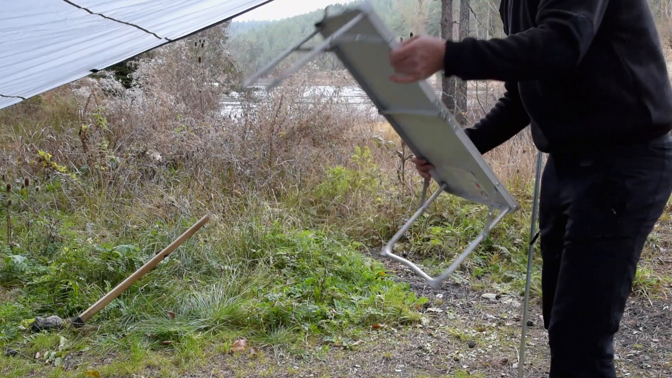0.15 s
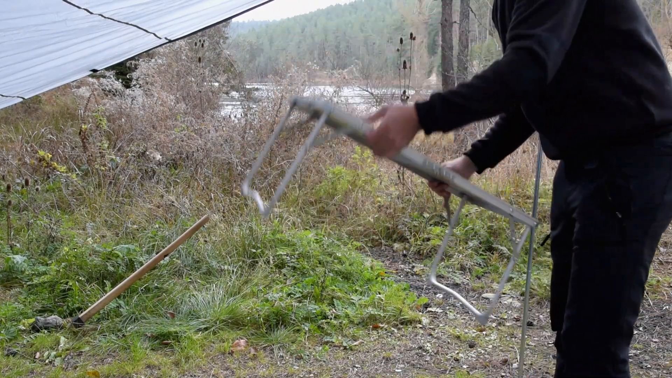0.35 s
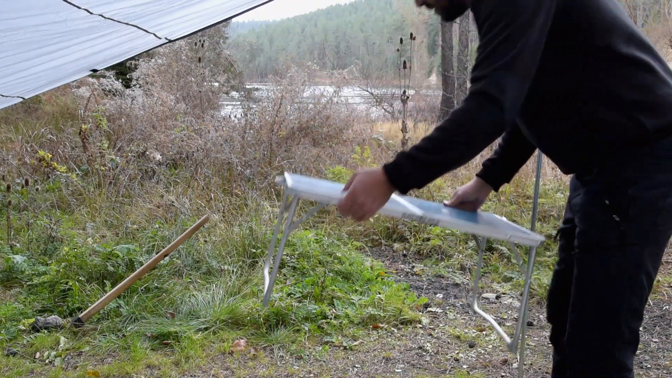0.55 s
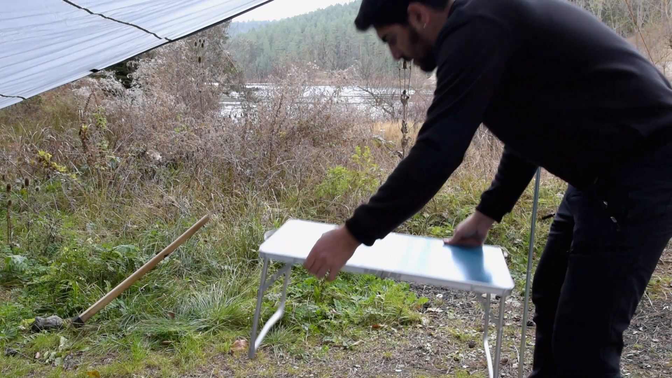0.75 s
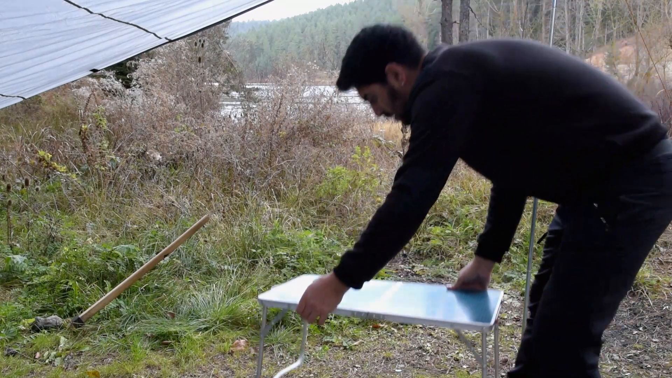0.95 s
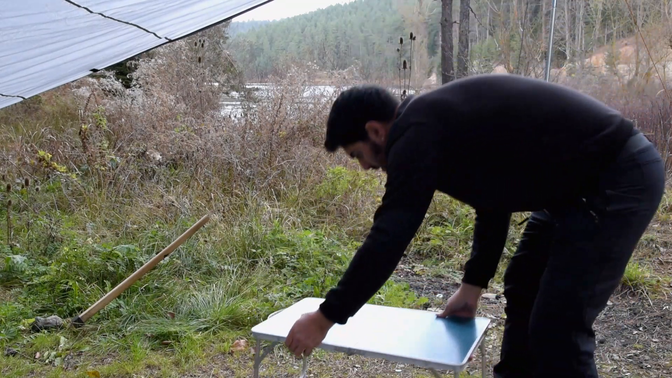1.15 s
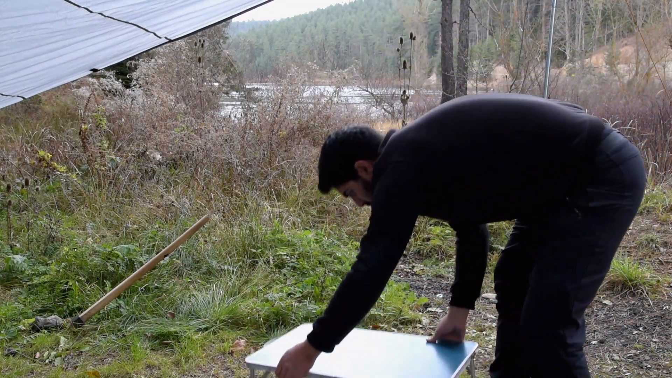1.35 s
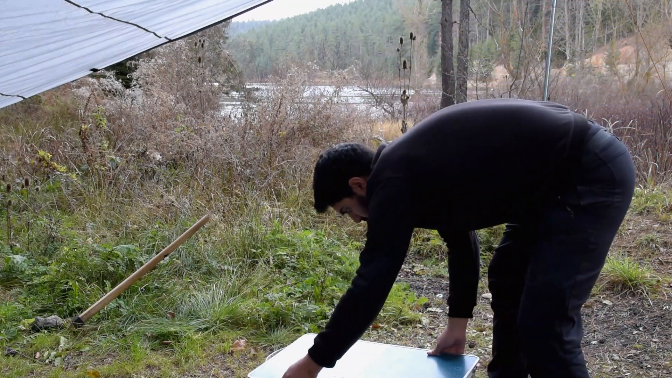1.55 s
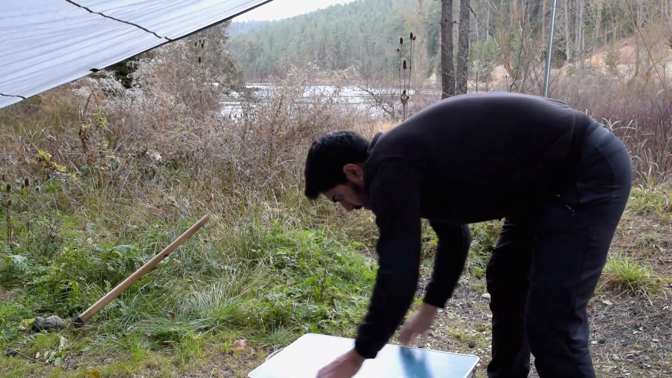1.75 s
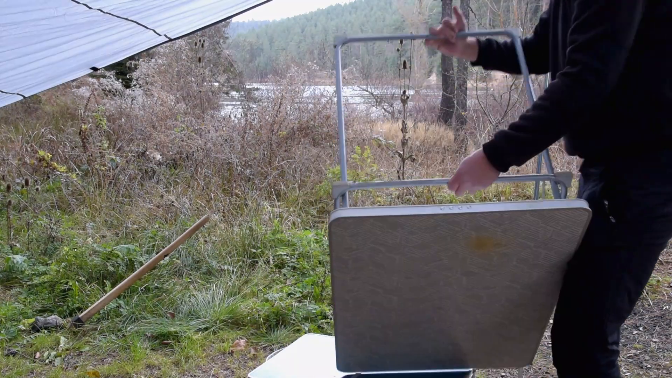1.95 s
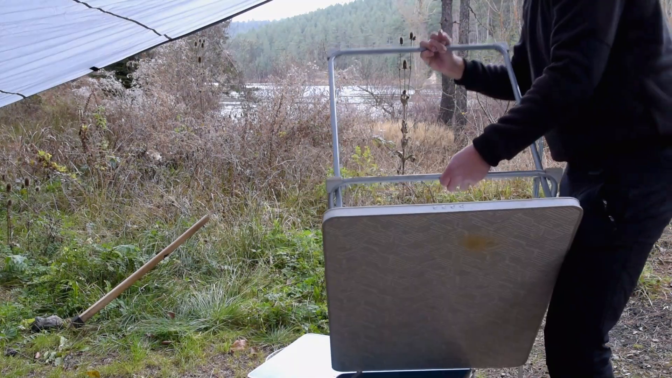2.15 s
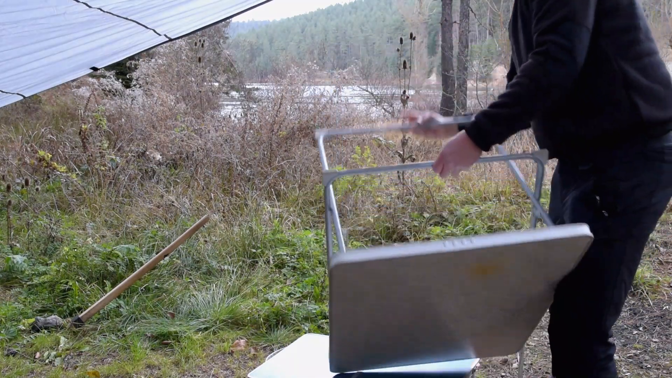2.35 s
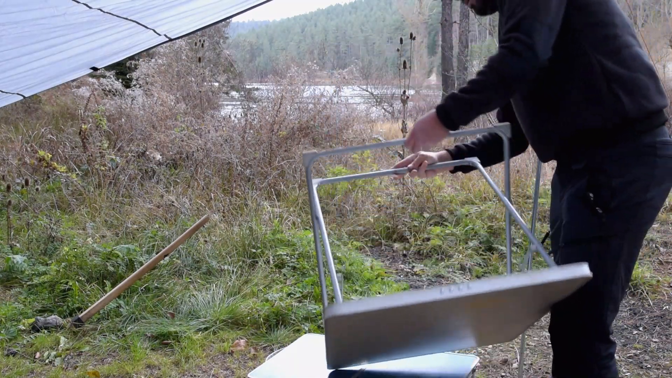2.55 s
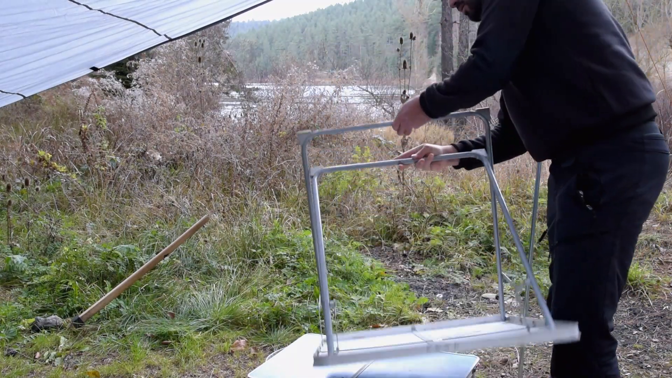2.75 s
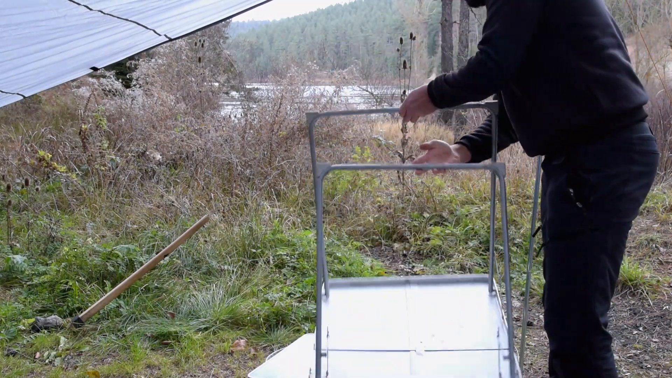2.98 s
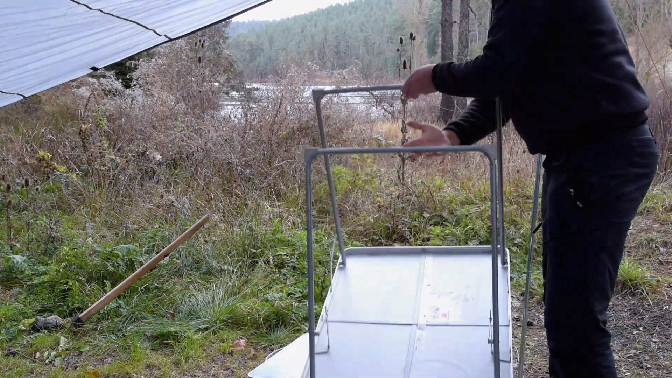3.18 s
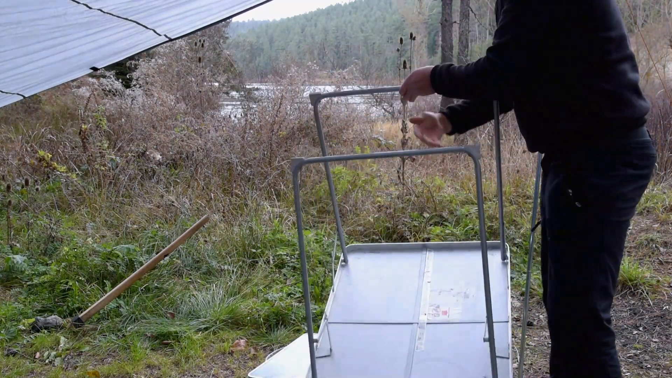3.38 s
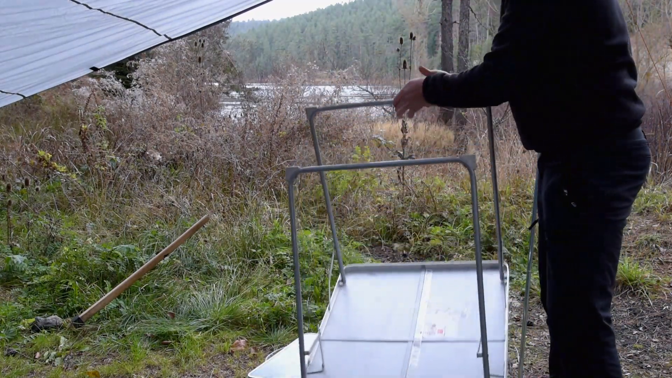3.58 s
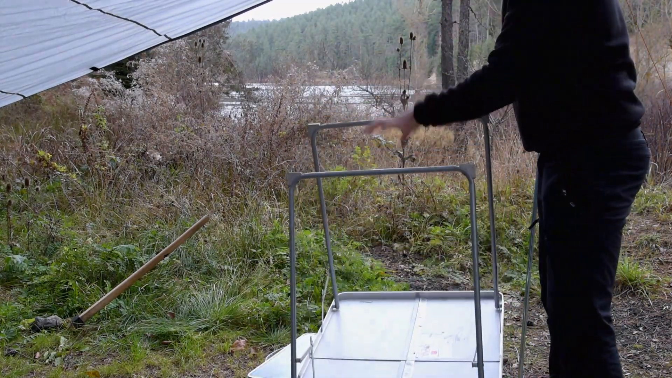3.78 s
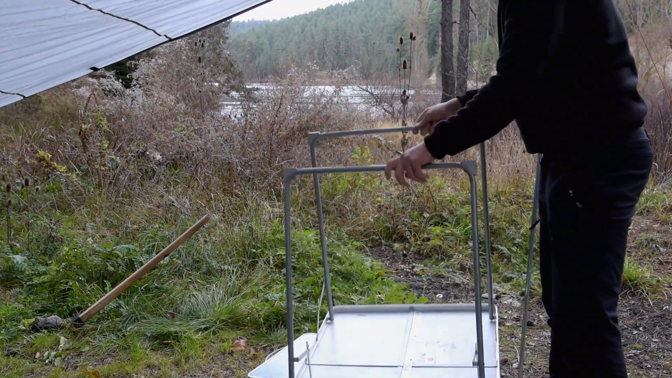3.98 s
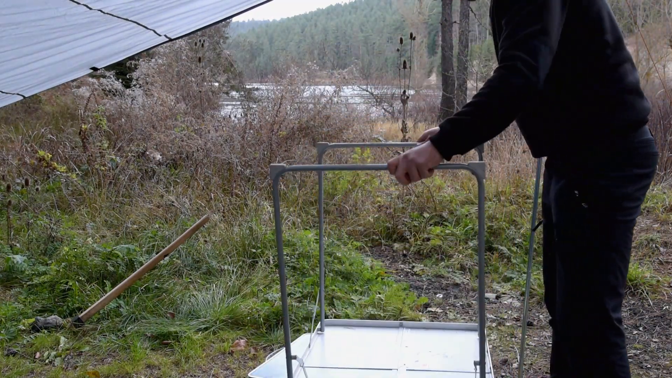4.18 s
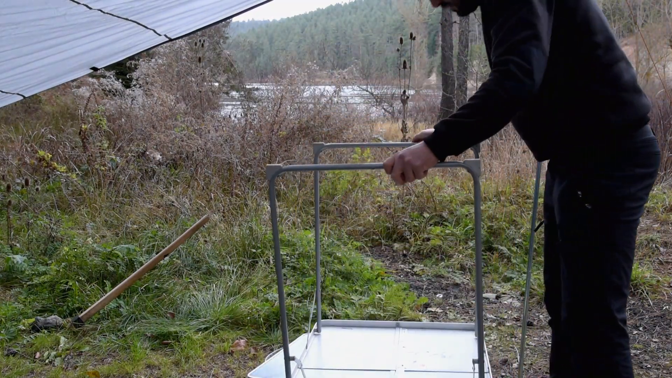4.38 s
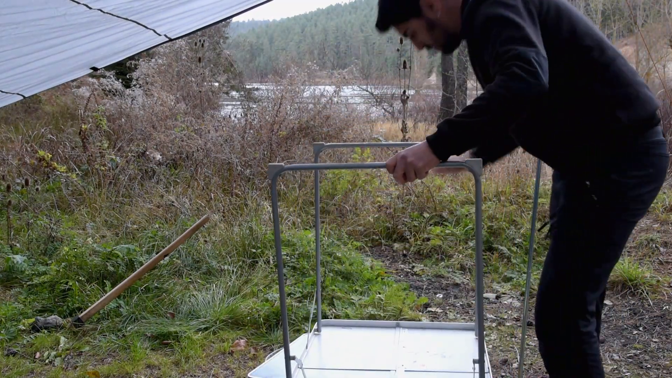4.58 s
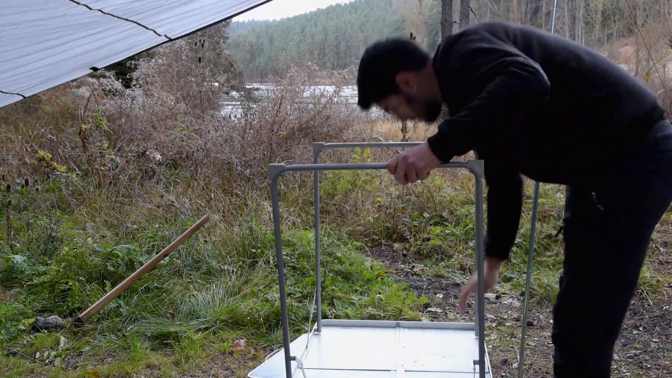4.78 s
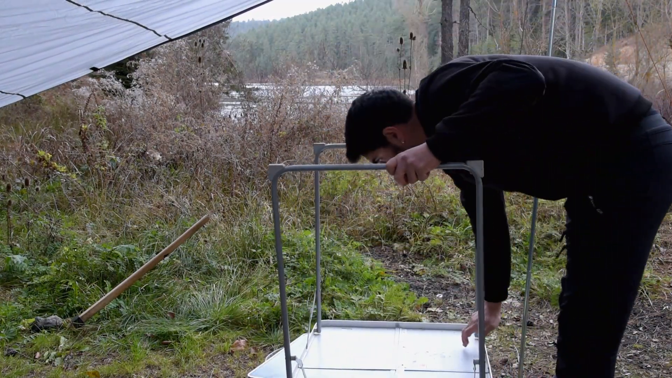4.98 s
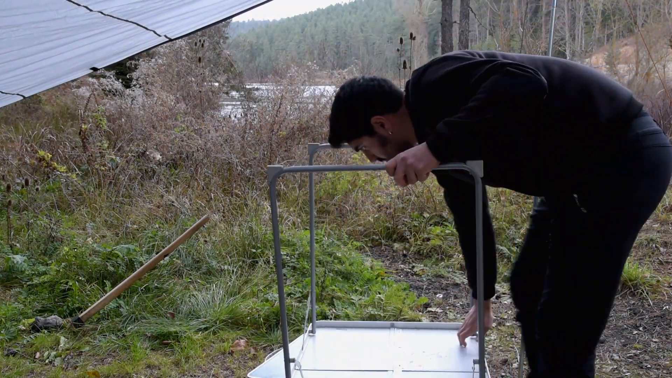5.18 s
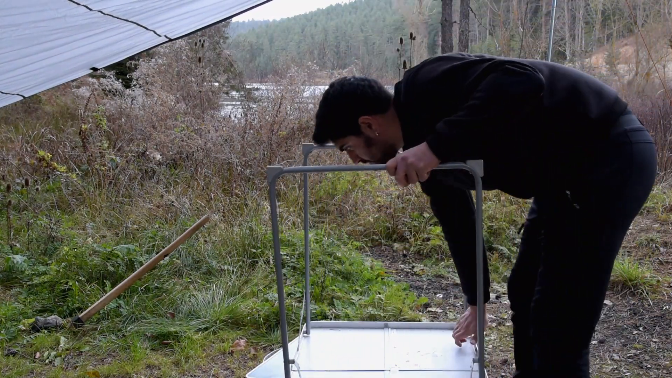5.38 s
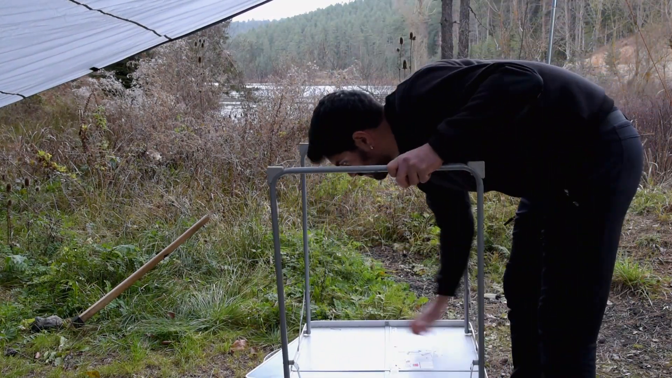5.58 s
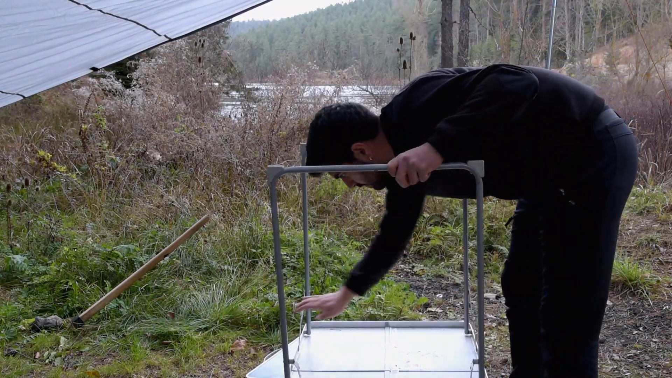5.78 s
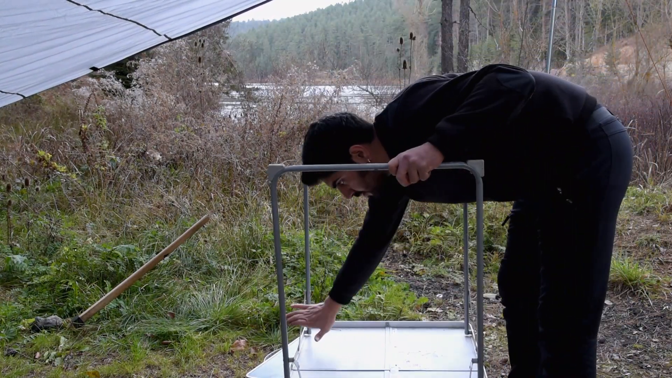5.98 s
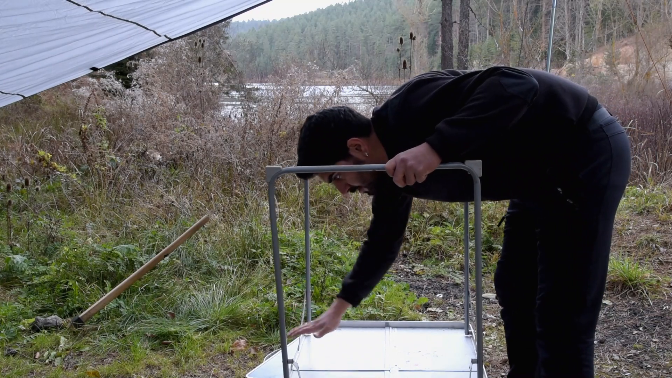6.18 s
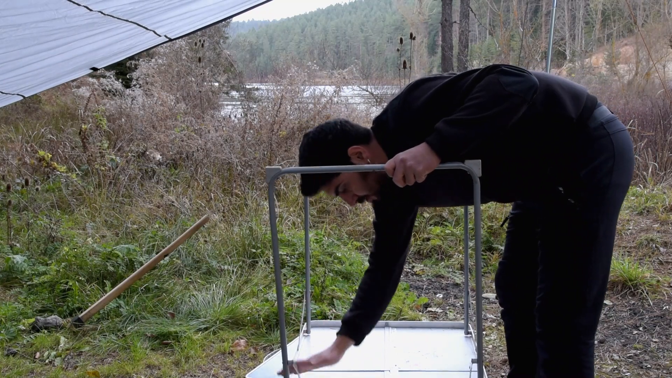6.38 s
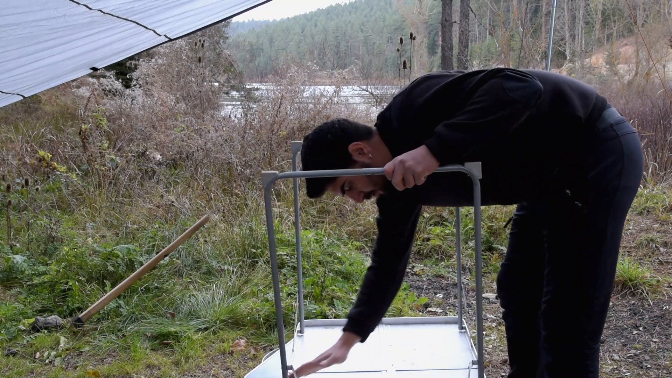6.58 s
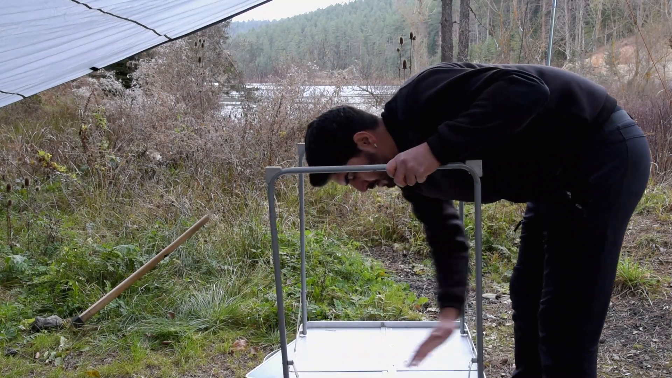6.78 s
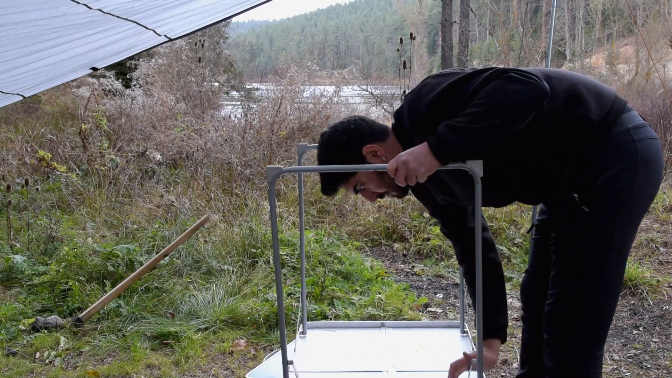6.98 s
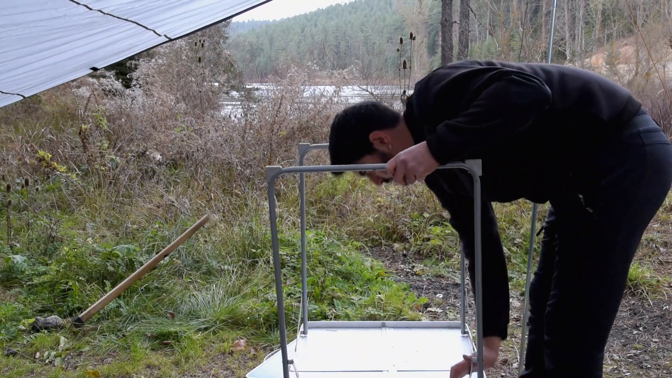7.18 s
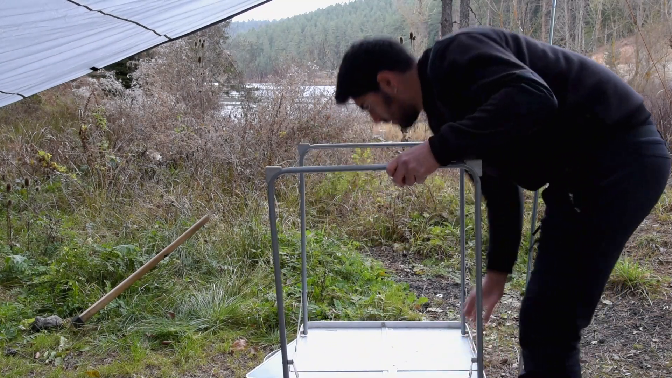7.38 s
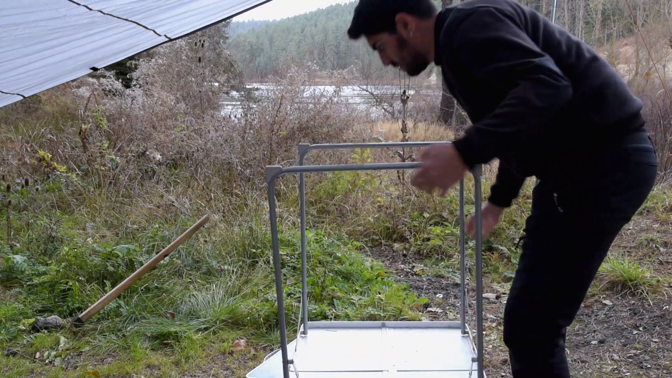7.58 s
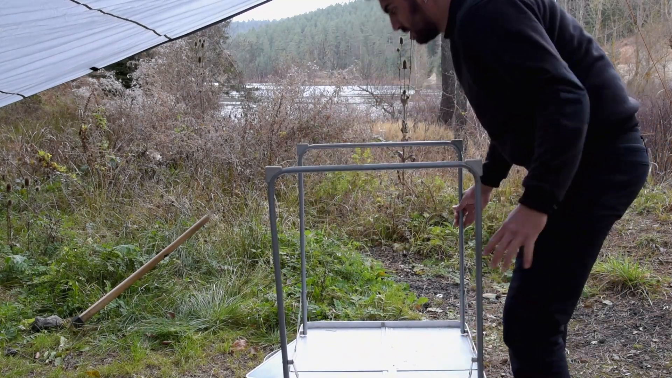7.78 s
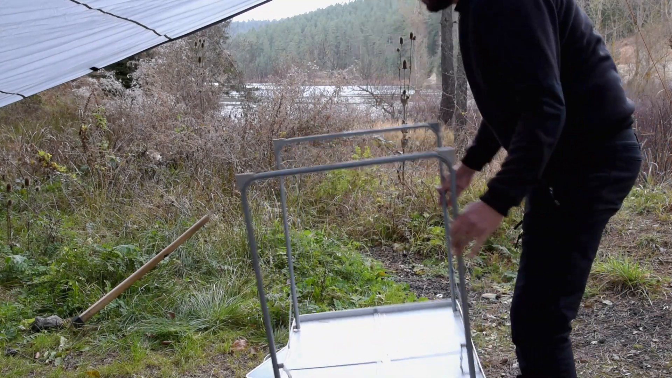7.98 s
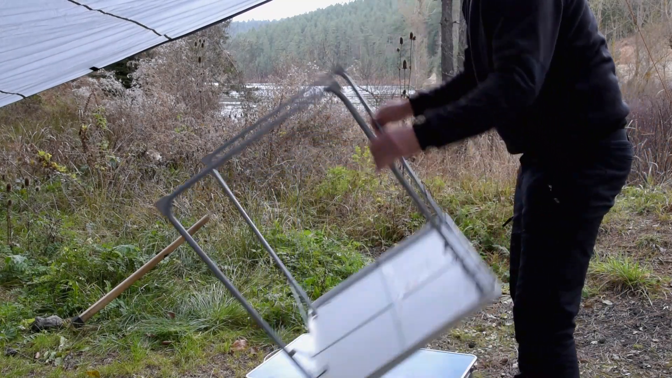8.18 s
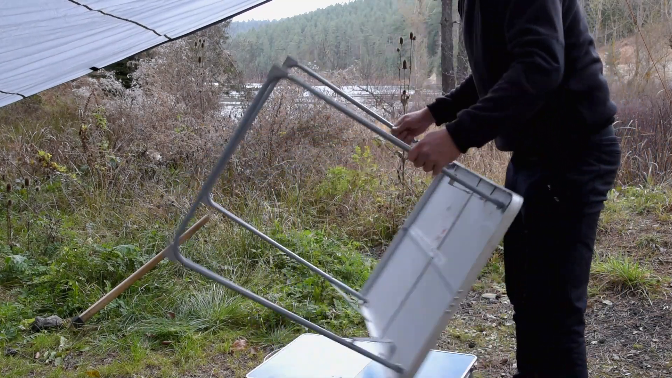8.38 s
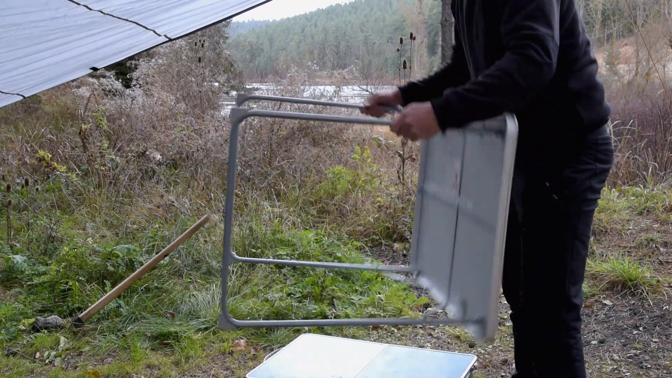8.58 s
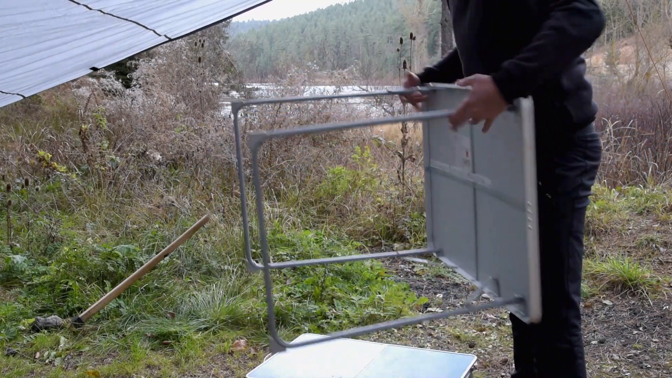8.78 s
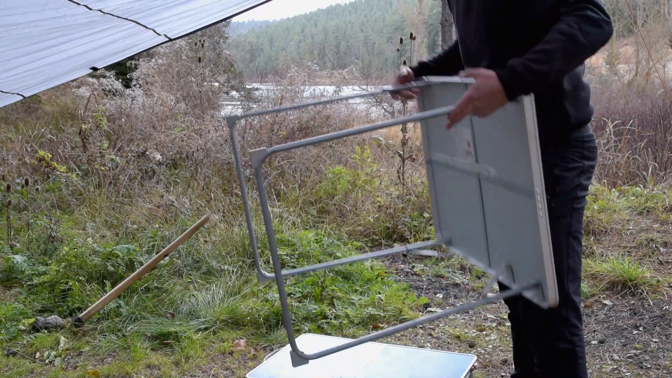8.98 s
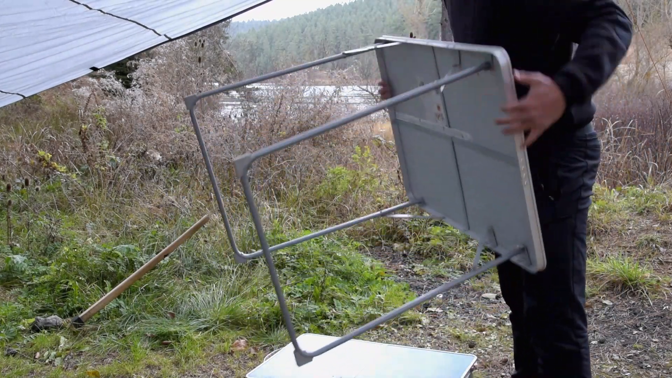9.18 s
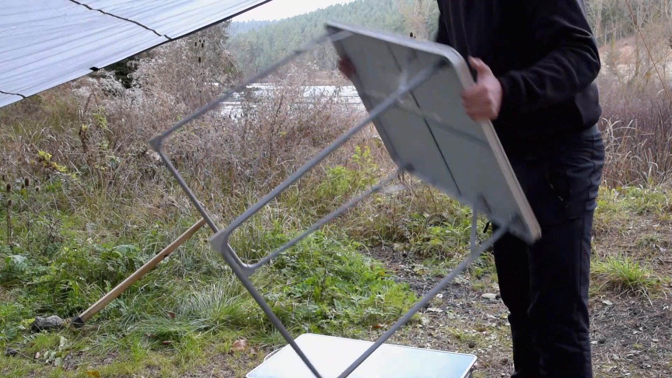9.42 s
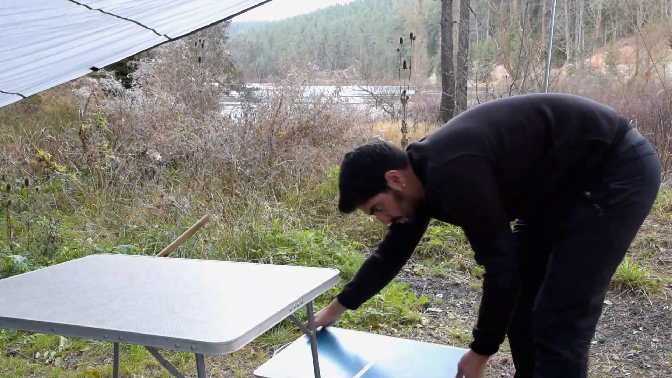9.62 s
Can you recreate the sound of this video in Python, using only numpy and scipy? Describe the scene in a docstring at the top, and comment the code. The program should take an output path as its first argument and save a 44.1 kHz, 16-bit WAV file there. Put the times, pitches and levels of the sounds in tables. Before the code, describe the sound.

Someone unfolds a metal-framed camp table outdoors. After a click and soft rustling of cloth and grass, legs and braces snap into place with sharp knocks, hollow clatter and dull bumps of the table top. The legs slide with a ringing scrape, and lighter ticks follow. Near the end the table is lifted and its loose catches rattle. It sounds close and slightly to the right, over a faint hiss of air.

```python
"""Outdoors, in light air and a low rumble, someone unfolds a metal-framed camp table. Legs, braces and
catches knock, and each knock shakes three parts: the small bright fittings, the hollow tubes and the
table top. Cloth and grass brush these parts, and hands, joints and feet scrape them. Sliding legs ring
the frame, catches tick, a turning joint whistles thinly, and a short low hum rises once.
Near the end the table is lifted and its loose catches rattle."""
import sys
import numpy as np
from scipy import signal
from scipy.fft import rfft, irfft, next_fast_len
from scipy.io import wavfile
from scipy.ndimage import map_coordinates

SR = 44100
rng = np.random.default_rng(int(sys.argv[2]) if len(sys.argv) > 2 else 0)


def transcribe(u):
    """Save the signal u as a 16-bit wav file named by the first command-line argument.

    u: samples, shape (n,) or (channels, n), limited to [-1, 1]; the rate is SR.
    q: integer samples, one column per channel.
    """
    v = np.clip(np.atleast_2d(u).T, -1, 1)
    q = np.round(v * 32767).astype(np.int16)
    wavfile.write(sys.argv[1], SR, q)


N = 425561


def amp(db):
    return 10 ** (np.asarray(db) / 20)


def unit(x):
    return x / np.sqrt(np.mean(np.abs(x) ** 2) + 1e-20)


def along(points, hz):
    """Read between (frequency, value) points on a log frequency scale."""
    f, v = np.transpose(points)
    return np.interp(np.log(hz + 1), np.log(f + 1), v)


def wobble(rate):
    """A smooth random curve with `rate` new values a second."""
    values = rng.standard_normal(int(N * rate / SR) + 4)
    return map_coordinates(values, [np.arange(N) * rate / SR])


def filtered(x, response):
    """Multiply each frequency in x by response(hz)."""
    size = next_fast_len(N + SR // 2)
    return irfft(rfft(x, size) * response(np.fft.rfftfreq(size, 1 / SR)), size)[..., :N]


def ring(modes, force):
    """A force shakes a part, which rings at its own pitches (its modes)."""
    def response(f):
        return unit(sum((-1) ** k * amp(db) * 1j * f * width / (hz * hz - f * f + 1j * f * width)
                        for k, (hz, width, db) in enumerate(modes)))
    return filtered(force, response)


def gesture(start, swell, hold, fade):
    """Strength of one move: it swells by 15.5 dB, holds, then drops 60 dB in `fade` seconds."""
    t = np.arange(N) / SR - start
    rising_db = 15.5 * (t / swell - 1)
    falling_db = -60 * (t - swell - hold) / fade
    return amp(np.clip(np.minimum(rising_db, falling_db), -120, 0)) * (t > 0)


def gestures(rows):
    """Overlapping moves add their power; a row is a move's timing, then its level."""
    return np.sqrt(sum((amp(db) * gesture(*timing)) ** 2 for *timing, db in rows))


def tone(hz, gain, waver_hz, flutter_db, rate):
    """A tone whose pitch and loudness tremble."""
    phase = 2 * np.pi * np.cumsum(hz + waver_hz * wobble(rate)) / SR
    return np.sqrt(2) * gain * amp(flutter_db * wobble(rate)) * np.sin(phase)


def noise(colour):
    """Two separate noises with the same balance of low and high."""
    return unit(filtered(rng.standard_normal((2, N)), lambda hz: amp(along(colour, hz))))


# Tone colour of the air: f/Hz, relative level/dB
AIR_COLOUR = [(59, -35), (100, -23), (150, 0.5), (358, -0.5), (1100, -10), (3190, -14.5), (3620, -12.5),
              (8640, -15), (9610, -13), (14100, -21), (16000, -28)]


def air():
    """Light air makes a soft, nearly steady hiss."""
    return amp(-62.5 + 0.4 * wobble(13)) * noise(AIR_COLOUR)


# Tone colour of the rumble: f/Hz, relative level/dB
RUMBLE_COLOUR = [(12, -65), (20, -14), (97, 0), (130, -2), (170, -6), (290, -120)]
# Heavy thumps: t/s, level/dB
THUMPS = [(1.46, -41.5), (1.49, -50), (1.99, -42.5), (2.03, -38), (2.23, -47.5), (2.29, -56), (2.53, -62),
          (2.75, -42), (2.8, -59), (3.05, -41.5), (3.09, -42), (3.18, -49), (3.329, -39.5), (3.94, -66),
          (4.12, -55), (4.22, -56), (5.23, -58), (5.93, -55), (6.44, -50), (7.07, -60), (7.96, -61),
          (8.41, -52.5), (8.87, -52), (9.16, -48), (9.24, -55)]


def rumble():
    """A faint, uneven rumble swells with each thump of the table."""
    swell_s, hold_s, fade_s = 0.016, 0.015, 0.3
    thumps = gestures((start, swell_s, hold_s, fade_s, db) for start, db in THUMPS)
    return np.hypot(thumps, amp(-68)) * amp(2.15 * wobble(19)) * noise(RUMBLE_COLOUR)


# Brushing on the fittings: t/s, level/dB
RUSTLE = [(0, -60.5), (.43, -59), (.78, -55), (1.5, -57.5), (2, -55), (4.4, -62.5), (4.8, -61), (5.4, -65),
          (6.3, -79), (7.7, -64), (8.2, -74), (9.65, -48)]


def rustle():
    """Cloth and grass brush the table: how hard they rub the fittings, tubes and top."""
    times, levels = np.transpose(RUSTLE)
    db = np.interp(np.arange(N) / SR, times, levels)
    return amp([db, db - 5, db - 13])


# Knocks: t/s, fittings level/dB, tubes above fittings/dB, top above fittings/dB, base fade time/s
KNOCKS = [(0.047, -24, -20, -29, 0.11), (0.702, -36, -17, -37, 0.21), (0.768, -36, -31, -20, 0.1),
          (1.212, -50, -1, -4, 0.045), (1.464, -29, -10, -10, 0.18), (1.505, -19, -1, -6.5, 0.053),
          (1.993, -10, -3.5, -5, 0.075), (2.051, -25.5, 1, 2, 0.045), (2.086, -28, -3, -3, 0.047),
          (2.125, -26, -6, -18, 0.052), (2.226, -31, 10.5, 5, 0.078), (2.253, -17.5, 0, -11.5, 0.12),
          (2.427, -38.5, -2, 0, 0.11), (2.754, -10, -4, -18, 0.088), (3.054, -7.5, -4.5, -4.5, 0.095),
          (3.095, -15.5, -4, -9.5, 0.14), (3.23, -26.5, 4.5, -2, 0.04), (3.269, -23, -2.5, -6, 0.1),
          (3.335, -8.5, -4.5, -10, 0.12), (3.397, -32, 9, 5.5, 0.096), (3.561, -26.5, -13, -20, 0.34),
          (3.707, -23, -10, -36, 0.11), (3.964, -37.5, 6, 6.5, 0.063), (4.027, -29, -13, -8, 0.091),
          (4.085, -23.5, -12, -25, 0.48), (4.12, -10, -4.5, -12, 0.11), (4.236, -17.5, 0, -11, 0.052),
          (4.38, -32.5, -33, -41, 0.13), (4.422, -26.5, -16.5, -46, 0.082), (4.463, -21.5, -17, -18, 0.036),
          (4.475, -29, -24, -35, 0.073), (4.684, -45, -14, -29, 0.22), (4.819, -32.5, -38, -40, 0.03),
          (4.94, -26, -10, -12.5, 0.2), (5.016, -22.5, -2, -5.5, 0.074), (5.082, -38, 4.5, 6, 0.06),
          (5.221, -25, -1, -6, 0.15), (5.295, -33, 13, 1, 0.049), (5.376, -44, 4, 4, 0.023),
          (5.503, -50, -17, -7, 0.13), (5.536, -42, -2.5, -9, 0.11), (5.583, -29.5, -17, -41, 0.043),
          (5.632, -51.5, 11, 11, 0.046), (5.707, -30.5, 3.5, -3.5, 0.056), (5.771, -36, 5.5, -0.5, 0.077),
          (5.895, -33.5, -28, -12, 0.08), (5.906, -25.5, -29, -27, 0.066), (5.939, -22.5, -5, -4, 0.14),
          (5.971, -14, -11, -21, 0.051), (6.051, -41, 1, 5.5, 0.054), (6.12, -35, -15, -34, 0.064),
          (6.137, -35, -21, -31, 0.097), (6.195, -30.5, -12.5, -27, 0.063), (6.318, -56.5, 7, 9.5, 0.044),
          (6.4, -41, -4, -3, 0.22), (6.422, -30.5, -12.5, -19, 0.55), (6.452, -15.5, -3, -8, 0.11),
          (6.649, -35.5, 4, 5.5, 0.086), (6.712, -42, -17, -21, 0.2), (6.733, -28.5, -11, -14.5, 0.16),
          (6.756, -21.5, -12, -16.5, 0.048), (6.825, -54, 3, 9, 0.088), (6.988, -17, -19, -24.5, 0.19),
          (7.023, -11.5, -10, -31, 0.059), (7.066, -44.5, 6, 10.5, 0.1), (7.123, -31, -12, -28, 0.079),
          (7.165, -39, -14, -34, 0.19), (7.244, -33, -1.5, -1, 0.044), (7.318, -32.5, -39, -33, 0.044),
          (7.416, -16, -19, -50, 0.063), (7.486, -50.5, 2.5, 8, 0.076), (7.68, -58, 4, 10, 0.12),
          (7.737, -21.5, -11.5, -30, 0.062), (7.833, -46, 5, 4, 0.054), (7.875, -28.5, -18, -39, 0.14),
          (7.891, -19, -18.5, -34, 0.059), (8.212, -32, -19, -44, 0.14), (8.247, -27.5, -35, -47, 0.085),
          (8.268, -30, -38, -47, 0.13), (8.295, -20, -34, -55, 0.079), (8.332, -29.5, -16.5, -47, 0.25),
          (8.375, -29, -31, -30, 0.11), (8.419, -28, -1, -16.5, 0.052), (8.452, -16, -42, -46, 0.059),
          (8.477, -16.5, -37, -42, 0.038), (8.582, -18, -23, -40, 0.12), (8.626, -25, -30, -23, 0.041),
          (8.677, -36, -30, -41, 0.16), (8.801, -17, -20, -34, 0.065), (8.845, -30, -19, -21, 0.088),
          (8.867, -21.5, -8.5, -18.5, 0.11), (8.91, -14.5, -23, -25, 0.073),
          (8.968, -14, -16.5, -35, 0.051), (9.025, -29.5, -26, -19, 0.058), (9.065, -36, -11, -11, 0.073),
          (9.091, -36, -24, -24, 0.059), (9.112, -27, -10.5, -9, 0.061), (9.168, -24, 0.5, -10.5, 0.1),
          (9.217, -23, -32, -28, 0.041), (9.246, -24, -0.5, -17, 0.071),
          (9.258, -10.5, -14.5, -14.5, 0.061), (9.313, -23, -39, -38, 0.15),
          (9.341, -17.5, -29, -41, 0.066), (9.377, -22.5, -17.5, -22, 0.059), (9.415, -25, -48, -42, 0.064),
          (9.445, -21.5, -48, -52, 0.058), (9.554, -22, -7.5, -26, 0.058)]


def knocks():
    """Each knock is a crack and a dying rattle: how hard it shakes the fittings, tubes and top."""
    starts, db, tubes_above, top_above, fades = np.transpose(KNOCKS)
    t = np.arange(SR // 3) / SR

    def shake(levels, stretch, crack_db, rise_s):
        power = np.zeros(N + SR)
        crack = amp(crack_db - 60 * t / 0.007)
        attack = 1 - np.exp(-t / rise_s)
        for start, level, fade in zip(starts, levels, fades):
            rattle = amp(-60 * t / (stretch * fade))
            power[round(start * SR):][:len(t)] += (amp(level) * (crack + rattle) * attack) ** 2
        return np.sqrt(power[:N])

    # Bigger parts rattle longer.
    return [shake(db - 11, stretch=0.97, crack_db=-6, rise_s=0.00058),
            shake(db + tubes_above - 9, stretch=1.324, crack_db=6, rise_s=0.00052),
            shake(db + top_above - 6, stretch=1.59, crack_db=9, rise_s=0.002)]


# Scrapes: t/s, swell/s, hold/s, fade/s, fittings level/dB, tubes above fittings/dB, top above fittings/dB
SCRAPES = [(0.052, 0.024, 0.16, 0.45, -46, -8.5, -16.5), (1.461, 0.044, 0.028, 0.055, -38.5, 0, -2.5),
           (1.615, 0.025, 0.032, 0.13, -72, -12.5, -19), (2.003, 0.034, 0.097, 0.35, -41.5, 0, 1),
           (2.3, 0.066, .03, 0.75, -44.5, -3.5, -6), (2.397, 0.13, 0.041, 0.38, -40, -2.5, -6),
           (2.615, 0.056, 0.078, 0.16, -52, 8, 5), (2.765, 0.024, 0.036, 0.21, -45.5, 2, 5.5),
           (3.097, 0.03, 0.043, 0.36, -45.5, 6.5, 9.5), (3.378, 0.049, 0.1, 1, -46.5, 8, 0.5),
           (3.542, 0.036, 0.069, 1, -29.5, -1.5, -39), (3.68, 0.019, 0.092, 0.41, -28.5, -10.5, -16),
           (3.862, 0.022, 0.077, 0.49, -35.5, -26, -17), (4.128, 0.017, 0.021, 0.45, -34, -2.5, -2),
           (4.254, 0.017, 0.037, 0.16, -41.5, -5.5, -20), (4.671, 0.022, 0.032, 0.08, -49.5, -7.5, -18),
           (5.113, 0.15, 0.036, 0.34, -38.5, 0.5, -5.5), (5.217, .02, 0.071, 0.31, -51.5, 9, 10.5),
           (5.895, 0.06, 0.056, 0.22, -44.5, -5.5, -17), (6.457, 0.028, 0.025, 0.088, -48, 16, 3),
           (6.502, 0.036, 0.075, 0.14, -43.5, -0.5, -7), (7.05, 0.024, 0.028, 0.19, -49.5, -7, -1),
           (7.915, 0.044, 0.058, 0.13, -38, -6, -18), (8.056, 0.047, 0.014, 0.17, -35.5, -6.5, -23),
           (8.389, 0.033, 0.085, 0.57, -39, -14.5, -17), (8.655, 0.043, 0.14, 0.24, -44.5, -17, -22.5),
           (8.823, .04, 0.11, .3, -39.5, -13, -15), (9.04, .03, .06, .2, -58, -3, -6),
           (9.143, 0.023, 0.13, 0.16, -36.5, -10, -15), (9.31, .02, .12, .15, -45, -29, -27),
           (9.548, 0.026, .1, .3, -45.5, -5.5, -10.5)]


def scrapes():
    """Hands, joints and feet scrape: how hard they rub the fittings, tubes and top."""
    *timing, db, tubes_above, top_above = np.transpose(SCRAPES)
    return [gestures(zip(*timing, db + above)) for above in (0, tubes_above, top_above)]


def grit(rough_db, rate):
    """Rubbing catches and slips, in fast grains and slower clumps."""
    return unit(amp(rough_db * wobble(rate) + 2.75 * wobble(35)))


# How tight fittings, loose catches, tubes and top ring: f/Hz, width/Hz, relative level/dB
FITTING_MODES = [(4630, 1800, -10.5), (5540, 450, -3.5), (6260, 770, -6), (7160, 440, -0.5),
                 (7670, 670, -1.5), (8770, 640, -2), (9470, 750, -2), (10840, 2330, -8.5),
                 (13070, 1400, -14)]
LOOSE_MODES = [(3050, 1240, -17.5), (4500, 1700, -13), (6900, 2170, -6), (8070, 810, -1.5),
               (9220, 640, -2.5), (10420, 1600, -8), (12700, 1800, -17)]
TUBE_MODES = [(871, 155, -9), (1015, 132, -6.5), (1277, 241, -6), (1540, 180, -6), (1970, 516, -9),
              (2510, 200, -7.5), (2654, 164, -8.5), (3164, 390, -9), (3754, 860, -14.5)]
TOP_MODES = [(106, 34, -14), (191, 69, -3), (298.3, 72, 1), (356, 58.5, 1), (436, 41.5, 1.5), (542, 80, -1),
             (667, 163, -6)]


def table_parts(lifted):
    """Knocks and rubbing ring each part; once lifted, loose catches replace the tight fittings."""
    knock_fittings, knock_tubes, knock_top = knocks()
    rub_fittings, rub_tubes, rub_top = np.hypot(scrapes(), rustle())
    fittings = knock_fittings + rub_fittings * grit(rough_db=1.7, rate=1100)
    tubes = knock_tubes + rub_tubes * grit(rough_db=1.67, rate=400)
    top = knock_top + rub_top * grit(rough_db=0.85, rate=90)
    parts = [(FITTING_MODES, fittings * ~lifted), (LOOSE_MODES, fittings * lifted),
             (TUBE_MODES, tubes), (TOP_MODES, top)]
    return sum(ring(modes, force * rng.standard_normal((2, N))) for modes, force in parts)


# Leg slides: t/s, swell/s, hold/s, fade/s, level/dB
SLIDES = [(1.463, 0.028, 0.027, 0.12, -43), (2.327, 0.07, 0.27, .2, -51), (3.548, .04, 0.072, .4, -31.5),
          (3.684, 0.017, 0.078, 0.42, -36.5), (5.12, .1, .08, .2, -45.5), (7.93, 0.028, 0.056, .15, -38.5),
          (8.061, 0.048, 0.024, 0.088, -32)]
# How the leg frame rings: f/Hz, width/Hz, relative level/dB
FRAME_MODES = [(1300, 94, 1), (1750, 120, 1), (2000, 130, -2), (2510, 90, -4), (3290, 130, -0.5),
               (3950, 90, -5), (4630, 130, -1), (5100, 160, -6), (5590, 130, 5.5), (6140, 130, -6),
               (7160, 140, 3), (7430, 160, 7), (7900, 230, 3)]


def sliding_legs():
    """Legs slide in their joints and ring the frame; the moving grip damps now one pitch, now another."""
    grip_db, grip_rate = 3, 10
    force = gestures(SLIDES) * grit(rough_db=3.7, rate=200) * rng.standard_normal((2, N))
    shares = np.array([amp(db) * np.sqrt(width) for _, width, db in FRAME_MODES])
    shares /= np.linalg.norm(shares)
    return sum(share * unit(amp(grip_db * wobble(grip_rate))) * ring([mode], force)
               for share, mode in zip(shares, FRAME_MODES))


# Ticks of catches and fittings: t/s, level/dB
TICKS = [(1.9949, -10), (3.056, -15), (4.1205, -14), (5.5847, -26.5), (5.9733, -12.5), (6.9895, -23),
         (7.0244, -27), (7.4175, -22), (7.7368, -23), (8.2132, -34), (8.2482, -26), (8.2686, -31),
         (8.2955, -26), (8.333, -33), (8.4337, -20), (8.4512, -15), (8.4751, -14), (8.5824, -20),
         (8.6268, -21), (8.8024, -38), (8.8463, -29), (8.8645, -22), (8.9106, -20.5), (8.9695, -24),
         (9.1107, -20.5), (9.1676, -34), (9.2194, -15), (9.2445, -11), (9.2588, -8), (9.2734, -9),
         (9.3412, -13), (9.3776, -21), (9.3834, -21), (9.4175, -11), (9.4444, -16), (9.5542, -36)]


def ticks(lifted):
    """A tight fitting ticks from one sharp push; a loose catch chatters in a tiny burst of slips."""
    push_gain, chatter_gain = amp(11), amp(-11.5)
    chatter_hz, chatter_s = 8600, 0.0017
    times, db = np.transpose(TICKS)
    pushes = np.zeros((2, N))
    pushes[0, np.round(times * SR).astype(int)] = amp(db)  # row 0 goes to both left and right
    t = np.arange(0, chatter_s, 1 / SR)
    burst = chatter_gain * np.sin(np.pi * t / chatter_s) * np.sin(2 * np.pi * chatter_hz * t)
    chatter = signal.fftconvolve(pushes * lifted, burst[None], axes=1)[:, :N]
    return ring(FITTING_MODES, push_gain * pushes * ~lifted) + ring(LOOSE_MODES, chatter)


# Whistles: t/s, swell/s, hold/s, fade/s, f/Hz, level/dB
WHISTLES = [(2.36, .1, .12, .1, 9400, -57), (2.603, 0.023, 0.12, .2, 9500, -50.5),
            (2.845, 0.025, .15, .2, 9470, -61.5), (4.48, .03, .1, .15, 9900, -57),
            (7.45, 0.044, 0.046, 0.2, 9550, -67)]


def joint_whistle():
    """A joint whistles thinly as it turns, a little to the right."""
    whistle = sum(tone(hz, amp(db) * gesture(*timing), waver_hz=140, flutter_db=4.0, rate=230)
                  for *timing, hz, db in WHISTLES)
    return whistle * amp([[-1.2], [1.2]])


def low_hum():
    """A short, low hum rises in pitch."""
    start_s, start_hz, rise_hz_per_s = 4.8, 50.5, 23
    hz = start_hz + rise_hz_per_s * np.clip(np.arange(N) / SR - start_s, 0, 1)
    gain = amp(-59) * gesture(start_s, swell=0.08, hold=0.18, fade=0.4)
    return tone(hz, gain, waver_hz=0.85, flutter_db=1.0, rate=5.6)


# How alike left and right are: f/Hz, likeness (1 = the same)
LIKENESS = [(250, .9995), (500, 1), (1000, 0.91), (2000, 0.61), (4000, 0.46), (8000, 0.023), (14000, .05)]
# How much of the lean to the right each pitch gets: f/Hz, share (0 to 1)
LEAN_SHARE = [(300, 0), (600, 0), (1500, 1), (14000, 1)]


def stereo(pair):
    """Left and right share the bass but not the treble; the right is nearer the table, so louder."""
    def blend(hz):
        angle = np.arccos(along(LIKENESS, hz)) / 2
        return np.array([np.cos(angle), np.sin(angle)])
    shared, opposite = filtered(pair, blend)
    both = np.array([shared + opposite, shared - opposite])
    leaning = filtered(both, lambda hz: along(LEAN_SHARE, hz))
    return both + (amp([[-0.75], [0.75]]) - 1) * leaning


def scene():
    """The table is unfolded in the open air, then lifted."""
    lifted = np.arange(N) > 8.18 * SR  # from here on it hangs in the hands
    pair = air() + rumble() + table_parts(lifted) + sliding_legs() + ticks(lifted)
    return stereo(pair) + joint_whistle() + low_hum()


def record(dry):
    """Cut away the very highest treble."""
    return filtered(dry, lambda hz: hz < 15900)


dry = scene()
out = record(dry)
transcribe(out)
```